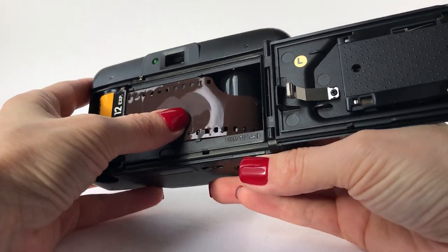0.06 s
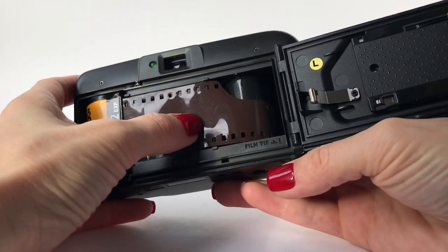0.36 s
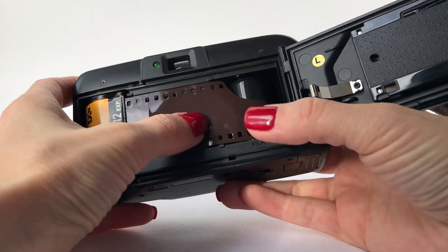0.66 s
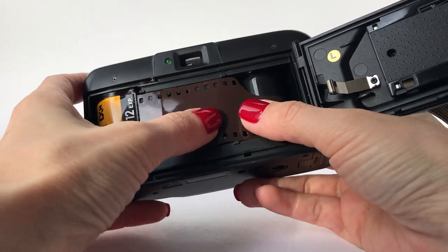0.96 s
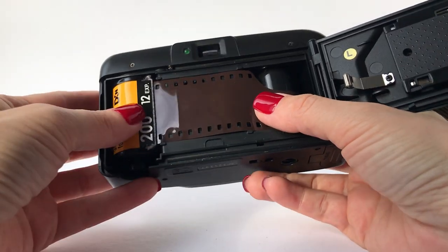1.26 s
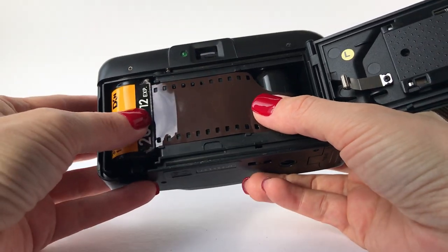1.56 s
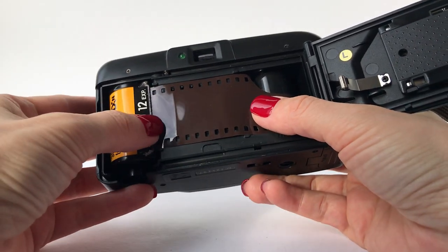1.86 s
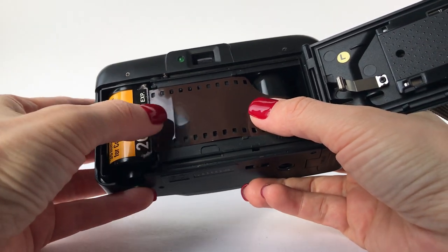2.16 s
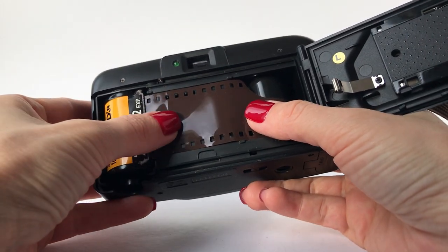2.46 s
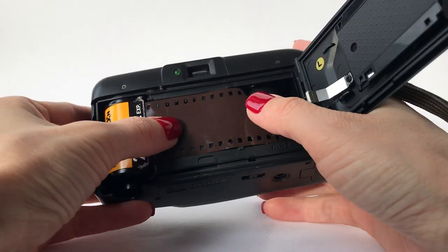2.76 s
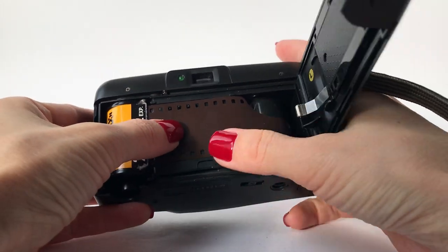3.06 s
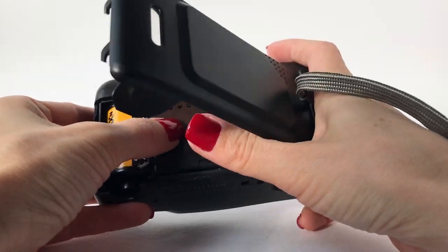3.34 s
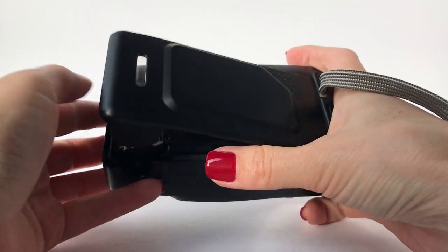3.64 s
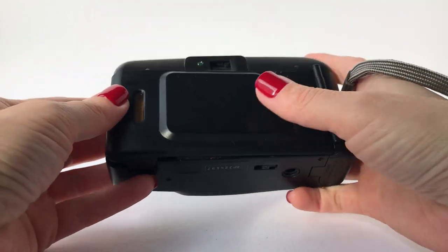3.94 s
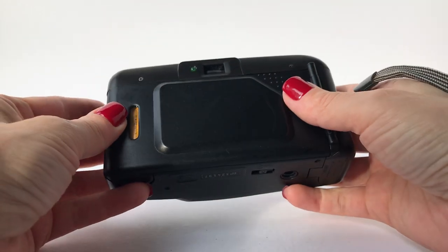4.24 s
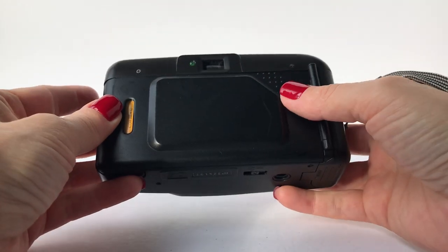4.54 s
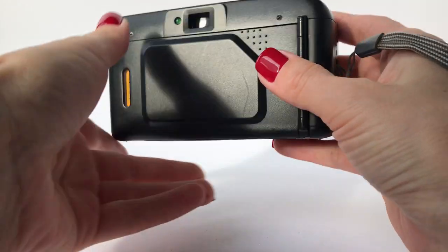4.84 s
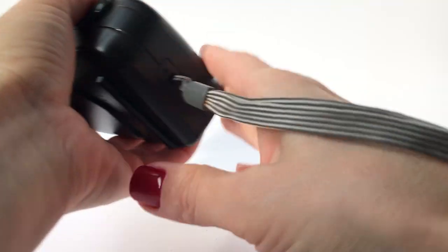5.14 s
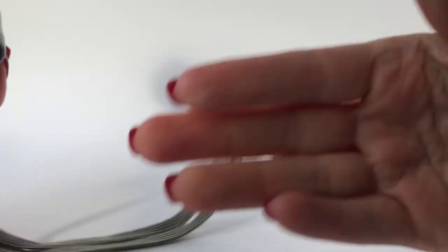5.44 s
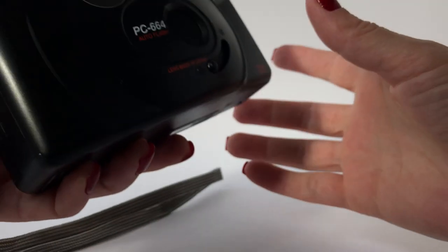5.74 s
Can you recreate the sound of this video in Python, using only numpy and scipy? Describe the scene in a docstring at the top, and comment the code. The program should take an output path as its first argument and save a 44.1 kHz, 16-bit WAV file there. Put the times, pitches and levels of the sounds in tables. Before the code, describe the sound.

Close up in a small quiet room with a low hum, fingers press film into a plastic compact camera with faint rubs, ticks and a brief rasp. The back door swings over with hollow clacks and a dry hinge squeak, knocks shut, then latches with a sharp snap that leaves its springs ringing briefly. Soft taps and swishes of a wrist strap follow as the camera is turned over.

```python
"""Soft rubs and ticks, a dry squeak, then a sharp, springy snap: a plastic compact camera is being loaded.
Fingers press the film in, swing the back door shut on its rubbing hinge, latch it and turn the camera over.
Every contact rings the small hollow shell, and the latch also rings its springs. Skin, film and the wrist
strap slide with a fine hiss. All of it is heard close up, in a small quiet room with a low hum."""
import sys
import numpy as np
from scipy import signal
from scipy.fft import rfft
from scipy.io import wavfile

SR = 44100
rng = np.random.default_rng(int(sys.argv[2]) if len(sys.argv) > 2 else 0)


def log_audio(samples):
    """Write samples as a 16-bit WAV file to the path given in sys.argv[1]."""
    # one column per channel
    frames = np.atleast_2d(samples).T
    # limit to full scale, then quantise
    limited = np.clip(frames, -1, 1)
    pcm = np.round(limited * 32767).astype(np.int16)
    wavfile.write(sys.argv[1], SR, pcm)


N = 255780
T = np.arange(N) / SR


def undb(db):
    """Decibels to gain."""
    return 10 ** (np.asarray(db) / 20)


def unit(x):
    """Scale to rms 1."""
    return x / np.sqrt(np.mean(x ** 2) + 1e-30)


def add(out, s, x):
    """Mix x into out from s seconds on."""
    i = int(np.clip(s * SR, 0, N - 1))
    out[i:i + len(x)] += x[:N - i]


def fade(t60, t=T):
    """A free decay that loses 60 dB in t60 seconds."""
    return np.exp(-np.log(1000) * t / t60)


def stroke(start, end, rise, fall):
    """Contact pressure that builds, holds and lets go; times in seconds."""
    return np.clip(np.minimum((T - start) / rise, (end - T) / fall), 0, 1)


def walk(rate_hz):
    """Smooth random drift with a spread near 1."""
    steps = rng.standard_normal(N // 20)
    return np.interp(T * rate_hz, np.arange(len(steps)), steps)


def low_cut(x, hz, order=2):
    """Roll off the bass below hz."""
    return signal.sosfilt(signal.butter(order, hz, "high", fs=SR, output="sos"), x)


def resonate(x, modes):
    """Drive parallel resonances with x. Each mode: pitch in Hz, width in Hz, gain in dB."""
    return sum(undb(db) * signal.lfilter(*signal.iirpeak(hz, hz / width, fs=SR), x)
               for hz, width, db in modes)


def ringing(modes):
    """Struck modes die away freely. Each mode: pitch in Hz, level in dB, t60 in seconds."""
    t = T[:SR // 2]
    return sum(undb(db) * np.sin(2 * np.pi * (hz * t + rng.random())) * fade(t60, t)
               for hz, db, t60 in modes)


def coloured(points):
    """Noise at rms 1, shaped by an EQ curve of (Hz, dB) points."""
    hz, db = np.transpose(points)
    gain = undb(np.interp(np.log(np.fft.rfftfreq(N, 1 / SR) + 1), np.log(hz), db))
    return unit(np.fft.irfft(rfft(rng.standard_normal(N)) * gain, N))


def friction(grain_db):
    """A stream of tiny slips of unequal size; more grain_db makes it grittier."""
    noise = rng.standard_normal(N)
    slip_sizes = np.minimum(rng.exponential(size=N // 8 + 1), np.pi)
    return noise * undb(grain_db * np.repeat(slip_sizes, 8)[:N])


def shell(force):
    """The hollow plastic shell answers a force in four bands, low to high: thump, knock, clack, tick."""
    # Resonances of the shell. Each row: pitch in Hz, width in Hz, gain in dB.
    shell_modes = [(270, 150, 3), (610, 96, 3.5), (848, 200, 8), (1076, 250, 0.5), (1292, 280, 3),
                   (1825, 440, 0.5), (2610, 380, 1), (3150, 260, -3.5), (3890, 910, 3.5), (4410, 230, -6),
                   (6240, 1400, 2), (8910, 1000, 6), (12740, 2900, 3), (14400, 3600, 1.5)]
    # The edges of the four bands in Hz.
    edges_hz = [70, 600, 2200, 6500, 16500]
    body = force + resonate(force, shell_modes)
    return [signal.sosfilt(signal.butter(3, band, "band", fs=SR, output="sos"), body)
            for band in zip(edges_hz, edges_hz[1:])]


def room_tone(air_db=-69):
    """The bed: low rumble and hiss of still air, with a few wavering hum tones."""
    # Colour of the air. Each row: frequency in Hz, relative level in dB.
    air_curve = [(15, -39), (25, -4), (242, -7.5), (301, -12), (607, -16), (677, -17.5), (936, -19.5),
                 (1610, -26.5), (2000, -25.5), (2550, -28), (2990, -25.5), (4870, -31), (13600, -31.5),
                 (14800, -26.5), (16000, -29.5)]
    # Tones of the room's hum. Each row: pitch in Hz, width in Hz, level in dB.
    hum_tones = [(54.7, 8, -78.5), (130.8, 7.4, -75.5), (186, 7.9, -76.5), (237, 3, -73)]
    hum = np.zeros(N)
    for hz, width, db in hum_tones:
        tone = resonate(rng.standard_normal(N), [(hz, width, 0)])
        hum += undb(db) * unit(resonate(tone, [(hz, 4 * width, 0)]))  # a second pass trims the skirts
    return undb(air_db) * coloured(air_curve) + hum


def reflections(x, wet_db=-17, t60=0.31, gap_s=.008, bright=0.34):
    """Bare, bright walls add a short tail to the direct sound."""
    t = T[:SR // 2]
    tail = rng.standard_normal(len(t)) * fade(t60, t) * np.clip(t / gap_s - 1, 0, 1)
    # the small shell throws its treble into the room better than its bass
    tail = signal.lfilter([1, -bright / 2], [1], tail)
    return x + undb(wet_db) * signal.fftconvolve(x, tail / np.linalg.norm(tail))[:N]


def grip(slips_per_s=70, slip_s=0.0051, knock_db=-73, clack_db=-86, scatter_db=3):
    """The held shell creaks faintly under the fingertips."""
    # How restlessly the fingers shift. Each row: time in seconds, gain in dB.
    fidget = [(0, -22), (.2, 1.5), (.4, -13), (1.25, -7), (2.5, -17), (2.65, 2.5), (3, -5), (4.65, -7.5),
              (4.85, 2.5), (5.8, -7)]
    onsets = rng.random(N) < slips_per_s / SR
    slips = onsets * undb(scatter_db * np.clip(rng.standard_normal(N), -2, 1.5))
    bursts = signal.lfilter([1], [1, -np.exp(-1 / (slip_s * SR))], slips)
    _, knock, clack, _ = shell(bursts * rng.standard_normal(N))
    creak = undb(knock_db) * unit(knock) + undb(clack_db) * unit(clack)
    return creak * undb(np.interp(T, *np.transpose(fidget)))


def rubs(grain_db=3.0, waver_db=1.5, rise_share=0.32, fall_share=.3):
    """Skin slides over film and shell, with the finger pressure never quite even."""
    # Finger slides. Each row: start and end in seconds, knock level in dB, hardness in dB per band up.
    slides = [(0.093, 0.288, -73.5, 0), (0.22, 0.547, -78.5, 5.5), (.505, .597, -66.5, 1.5),
              (0.552, 0.756, -78.5, -0.5), (0.705, 0.987, -69.5, 3), (1.06, 1.33, -76, 0),
              (1.474, 1.53, -72.5, -5.5), (2.532, 2.81, -75.5, 2.5), (2.772, 2.914, -74.5, 0),
              (2.885, 2.958, -66, 3), (2.917, 3.257, -79, 2.5), (3.313, 3.392, -57, -1),
              (3.56, 3.737, -63, -8), (4.215, 4.308, -61, -7.5), (4.719, 4.883, -70.5, 1),
              (4.86, 5.513, -73.5, 2), (5.083, 5.177, -61, -2), (5.25, 5.31, -78.5, 7.5),
              (5.655, 5.86, -73, 5)]
    bands = [unit(band) for band in shell(friction(grain_db))[1:]]  # no thump
    out = np.zeros(N)
    for start, end, db, hardness in slides:
        pressure = stroke(start, end, rise_share * (end - start), fall_share * (end - start))
        out += pressure * sum(undb(db + hardness * k) * band for k, band in enumerate(bands))
    return out * undb(waver_db * walk(82))


def strap(grain_db=2.5, waver_db=1, rise_s=0.018, fall_s=0.025):
    """Threads of the woven wrist strap flick past the skin: a fine hiss, strongest at the very top."""
    # Swishes over the hand. Each row: start and end in seconds, level in dB.
    swishes = [(2.753, 2.829, -52.5), (4.86, 4.902, -47.5), (5.415, 5.489, -49.5), (5.546, 5.62, -48.5)]
    hiss = coloured([(500, -19), (1500, -9), (4000, -11.5), (6500, -8.5), (9000, -7.5),
                     (12000, 0.5), (15000, 2.5)])
    weave = undb(waver_db * walk(120) + grain_db * walk(1200))
    pressure = sum(undb(db) * stroke(start, end, rise_s, fall_s) for start, end, db in swishes)
    return unit(hiss * weave) * pressure


def film(grain_db=4, creep_start_s=.23, creep_db=-75, build_db_per_s=443, release_db_per_s=700):
    """The springy strip sticks and slips under the thumb with a hollow rasp, and rings as it lets go."""
    # Resonances of the curled strip. Each row: pitch in Hz, width in Hz, gain in dB.
    strip_modes = [(347, 43, 2.5), (1116, 93, 1), (1910, 130, 0.5), (2450, 120, 1.5), (2760, 100, -7),
                   (4050, 140, -5.5), (5530, 350, -4)]
    # Slips that the rasp swells up to. Each row: time in seconds, peak level in dB.
    slips = [(.535, -57.5), (.577, -49)]
    # Ring of the freed strip. Each row: pitch in Hz, level in dB, t60 in seconds.
    freed_modes = [(1121, -51, .14)]
    freed_s = slips[-1][0]
    creep = undb(creep_db) * stroke(creep_start_s, freed_s, rise=0.067, fall=0.067)
    swells = sum(undb(db - np.maximum(build_db_per_s * (s - T), release_db_per_s * (T - s)))
                 for s, db in slips)
    out = unit(resonate(friction(grain_db), strip_modes)) * (creep + swells)
    add(out, freed_s, ringing(freed_modes))
    return out


def hinge(start_s=3.487, end_s=3.819, base_db=-70, growth_db=28, jerk_db=17.5, jerk_s=.035):
    """Dry plastic rubs in the hinge and half sings: a jerk, then a swell as the door speeds up."""
    # Resonances of the hinge. Each row: pitch in Hz, width in Hz, gain in dB.
    hinge_modes = [(904, 350, -14.5), (1690, 100, 2), (2676, 130, -8), (5050, 310, -9.5), (6460, 240, -10),
                   (8100, 400, -16), (11400, 400, -9), (15100, 900, -6)]
    slips = friction(grain_db=3.25)
    warped_time = T + np.cumsum(.014 * walk(40)) / SR  # wobbles the pitch
    squeak = np.interp(warped_time, T, resonate(slips, hinge_modes))
    scrape = undb(-3) * unit(low_cut(slips, 600))
    swing_s = end_s - start_s
    elapsed = np.clip(T - start_s, 0, swing_s)
    swell = growth_db * (elapsed / swing_s) ** 2
    jerk = jerk_db * np.exp(-elapsed / jerk_s)
    level_db = base_db + swell + jerk - 0.8 * walk(92)  # the pressure is unsteady
    gate = stroke(start_s, end_s, rise=0.0055, fall=0.0055)
    return unit(unit(squeak) + scrape) * undb(level_db) * gate


def thuds(hz=105, t60=0.058):
    """The camera body bounces on the flesh of the hands."""
    # Heavy pushes that rock it. Each row: time in seconds, level in dB.
    pushes = [(2.95, -49.5), (4.3372, -30), (4.362, -38.5), (5.11, -45)]
    out, t = np.zeros(N), T[:SR // 4]
    for s, db in pushes:
        add(out, s, undb(db) * np.sin(2 * np.pi * hz * t) * fade(t60, t))
    return out


def contact(db, hardness, t60, mode_hz, lift_db, colour_db, low_hz=60, mode_q=8):
    """A sharp snap, then the plastic's crowded modes die away, high ones first; harder is brighter."""
    snap_db, snap_s, rise_s = 6, 0.0007, 0.00042
    decay_stretch = (1, 1.1, .9, .8)  # like colour_db, one value per band of the shell
    t = T[:SR // 8]
    snap = (1 + undb(snap_db) * np.exp(-t / snap_s)) * (1 - np.exp(-t / rise_s))
    force = rng.standard_normal(len(t)) * snap * fade(t60, t)
    force += resonate(force, [(mode_hz, mode_hz / mode_q, lift_db)])  # the touched spot's own mode
    force = low_cut(force, low_hz)  # light parts move no bass
    levels_db = db + np.array(colour_db) + hardness * (np.arange(4) - 1)  # tilt about the knock band
    out = 0
    for band, level_db, stretch in zip(shell(force), levels_db, decay_stretch):
        band = band * fade(t60, np.minimum(t, t60)) ** (1 / stretch - 1)
        attack_rms = np.sqrt(np.mean(band[:SR // 100] ** 2))
        out = out + undb(level_db) * band / attack_rms
    return out


def clicks():
    """Nails, door, catch, fingertips and film each ring the shell with their own colour and decay."""
    # Hard knocks of nails and door. Each row: start in seconds, base level in dB, hardness in dB
    # per band, t60 in seconds, mode of the struck spot in Hz, its lift in dB.
    knocks = [(.57, -49, 1, 0.063, 1140, 8), (3.313, -51.5, -2.5, .042, 1510, 9),
              (3.336, -38.5, -3.5, .062, 1450, 20), (3.346, -55.5, 8.5, 0.031, 1400, 0),
              (3.398, -50.5, 1.5, 0.035, 1190, 6), (3.542, -45, 2, 0.029, 1750, 9),
              (3.546, -47, 5.5, 0.075, 1720, 12), (3.558, -47, 4, 0.04, 3740, 18),
              (3.706, -43.5, 0.5, 0.097, 1930, 14), (3.72, -47, -4.5, 0.033, 720, 13),
              (3.804, -42.5, -7.5, 0.063, 1480, 14.5), (3.8195, -22.5, -3, 0.053, 1460, 4),
              (3.984, -39, -7.5, 0.027, 923, 8), (3.989, -40.5, -10, 0.048, 926, 14.5),
              (5.11, -41.5, 1, 0.03, 2080, 4)]
    # Each row of these four: start in seconds, base level in dB, hardness in dB per band.
    catch_snaps = [(4.339, -28, -4), (4.3619, -33.5, 1.5), (4.3773, -25.5, 1.5)]  # the catch rides over its hook and drops in
    nail_clacks = [(3.29, -48, -3.5), (4.78, -62, -1.5), (4.862, -55.5, 4.5), (5.012, -68.5, 3)]  # a nail on a thin edge of the case
    finger_taps = [(.099, -64.5, -8.5), (.153, -62, -10), (.269, -64.5, -17), (.921, -55, -3),
                   (1.772, -65.5, -19), (2.223, -63, -3), (2.569, -62.5, -6), (2.615, -54.5, -8),
                   (2.631, -55, -3.5), (2.678, -56.5, -6), (2.715, -63, -10), (2.934, -60.5, -6),
                   (2.966, -57, -11), (3.44, -61, -12), (3.668, -57.5, -5.5), (4.164, -55, -12),
                   (4.228, -58.5, -9), (4.242, -55, -8.5), (4.269, -44, -12), (4.721, -56, -5.5),
                   (4.743, -59.5, -12), (5.07, -58.5, -5), (5.343, -58, -10), (5.669, -63.5, 0)]  # soft fingertips on the shell
    film_ticks = [(0.122, -64.5, -11), (.238, -68, -12), (0.555, -53, -4.5), (0.564, -55, -3),
                  (1.089, -60, -6), (1.243, -70, -5), (1.345, -68.5, -6.5), (1.696, -69.5, -6),
                  (1.738, -63, -7), (1.898, -63.5, -8), (2.39, -53.5, -8.5), (2.401, -61.5, 1.5),
                  (2.412, -55.5, -9)]  # film against its sprocket and rails
    # Tiny bright ticks of hinge and strap fitting. Each row: start in seconds, base level in dB.
    tiny_ticks = [(2.95, -62), (3.025, -66), (3.047, -59.5), (3.095, -65), (3.358, -54), (3.366, -51),
                  (5.158, -62), (5.422, -59), (5.552, -48.5)]
    out = np.zeros(N)
    for s, db, hardness, t60, mode_hz, lift_db in knocks:
        add(out, s, contact(db, hardness, t60, mode_hz, lift_db,
                            colour_db=(-18.5, 0, -2.3, 0.5), low_hz=290))
    for s, db, hardness in catch_snaps:
        add(out, s, contact(db, hardness, t60=0.037, mode_hz=3350, lift_db=14,
                            colour_db=(-12, 1, 2.5, -2), mode_q=3.5))
    for s, db, hardness in nail_clacks:
        add(out, s, contact(db, hardness, t60=0.04, mode_hz=3700, lift_db=16,
                            colour_db=(-26, -6.5, -0.5, -8.5), mode_q=3.3))
    for s, db, hardness in finger_taps:
        spot_hz = 850 * 2 ** (0.11 * rng.standard_normal())  # each lands on a slightly different spot
        add(out, s, contact(db, hardness, t60=.034, mode_hz=spot_hz, lift_db=6.5,
                            colour_db=(-18.5, -0.5, -2.5, -2.5)))
    for s, db, hardness in film_ticks:
        add(out, s, contact(db, hardness, t60=0.027, mode_hz=2010, lift_db=14,
                            colour_db=(-30, 0, -1, 0.5)))
    for s, db in tiny_ticks:
        add(out, s, contact(db, hardness=0, t60=0.013, mode_hz=1880, lift_db=11,
                            colour_db=(-30, -16, -12.5, -0.5)))
    return out


def latch(tap_s=3.984, home_s=4.378, spring_db=-42, buzz_db=-30, coils_db=-48, sizzle_db=-31):
    """A thumb tap rings the shut door; the latch snaps home and its springs shiver, treble fading first."""
    # Springs of latch and pressure plate. Each row: pitch in Hz, relative level in dB, t60 in seconds.
    spring_modes = [(86, -9, .45), (241, -12, 0.2), (574, -2, 0.22), (1128, 5, 0.13), (1744, 6, 0.19),
                    (2300, 0, 0.14), (2680, -3.5, 0.27), (2790, -4, 0.4), (3020, -6.5, 0.37),
                    (3190, -4.5, 0.19), (3800, -4, 0.17), (4650, -6, .24), (5900, -10.5, .17),
                    (6374, -12, .25), (6900, -10, .24), (9100, -8, .26), (13200, -11.5, 0.19)]
    out = np.zeros(N)
    add(out, tap_s, ringing([(920, -44, 0.15)]))
    buzz = coloured([(300, -18.5), (750, -13.5), (1050, -1.5), (1850, -2), (2500, -2), (3900, 0),
                     (7500, -8), (9300, -2), (11000, -20.5)])
    coils = coloured([(1300, -14), (2850, 1), (4400, -3), (7500, -6.5), (9300, -9), (11000, -27.5)])
    sizzle = unit(low_cut(rng.standard_normal(N), 5000, order=1))
    add(out, home_s, undb(buzz_db) * buzz * fade(t60=0.27))
    add(out, home_s, undb(coils_db) * coils * fade(t60=0.63))
    add(out, home_s, undb(sizzle_db) * sizzle * fade(t60=0.22))
    add(out, home_s, undb(spring_db) * ringing(spring_modes))
    return out


def scene():
    """The handled camera in its room, in mono."""
    camera = clicks() + thuds() + rubs() + film() + strap() + grip() + hinge() + latch()
    return (reflections(camera) + room_tone())[None]


def record(dry):
    """The recorder sheds the deepest rumble and cuts the top steeply at 16 kHz."""
    lean = low_cut(dry, 44, order=5)
    return signal.sosfilt(signal.ellip(10, .2, 70, 16000, fs=SR, output="sos"), lean)


dry = scene()
out = record(dry)
log_audio(out)
```